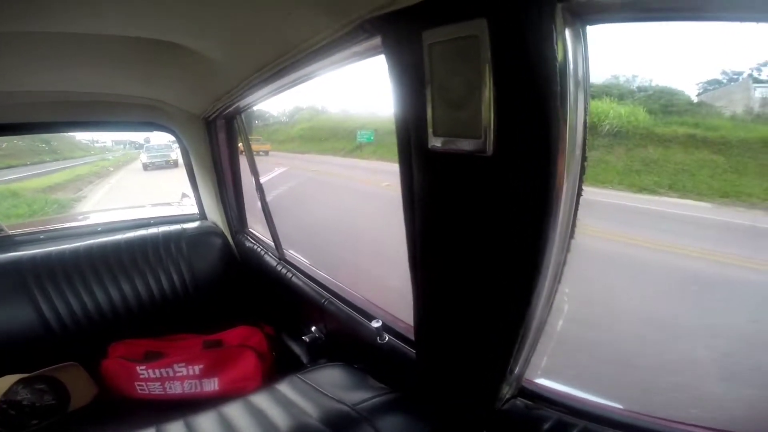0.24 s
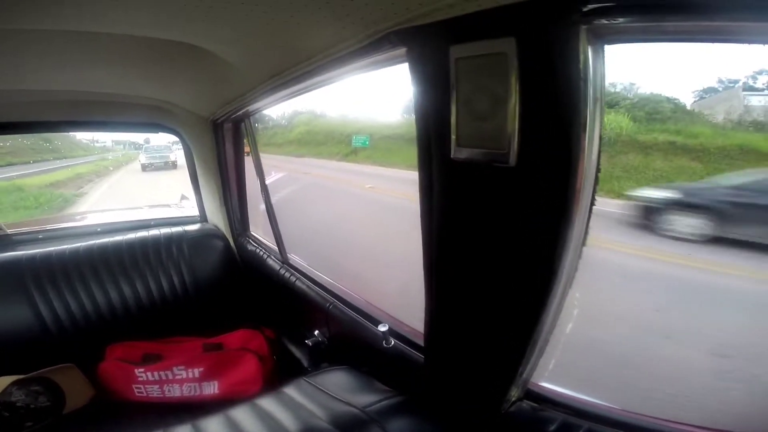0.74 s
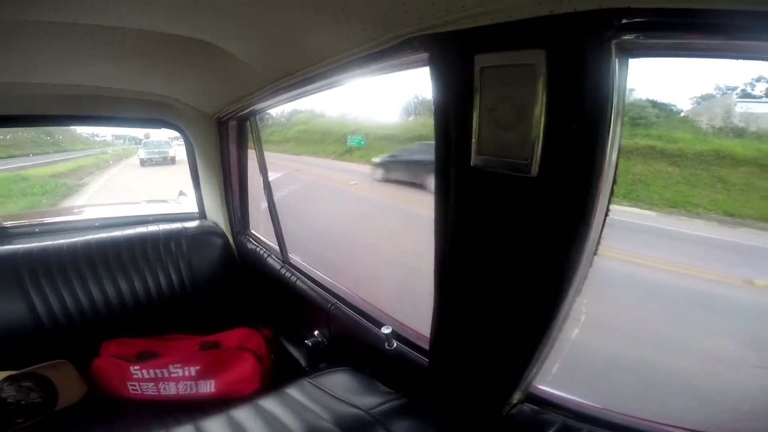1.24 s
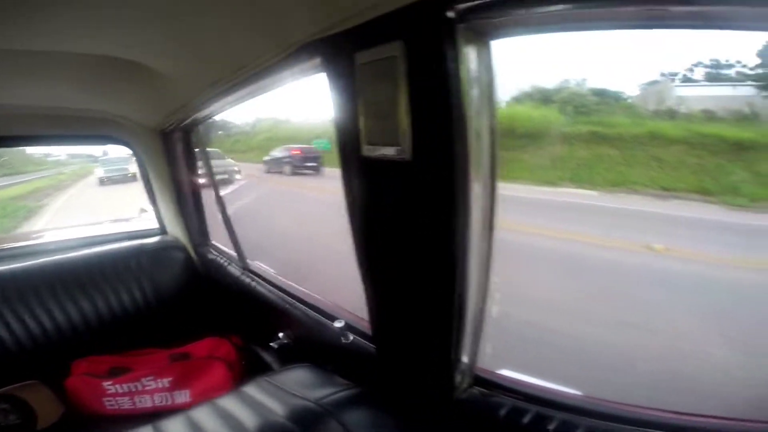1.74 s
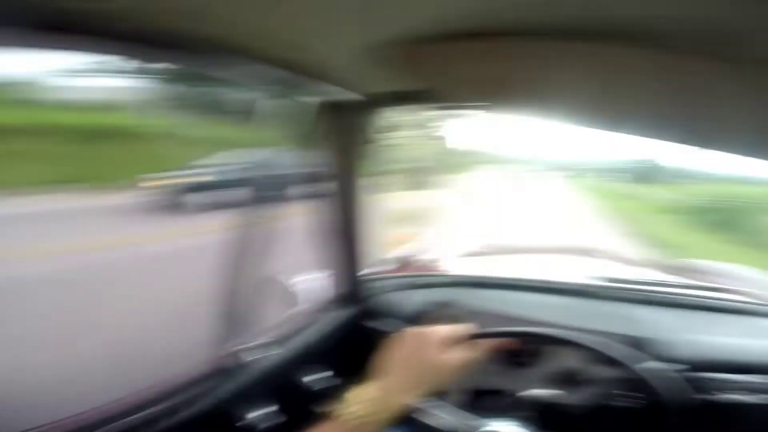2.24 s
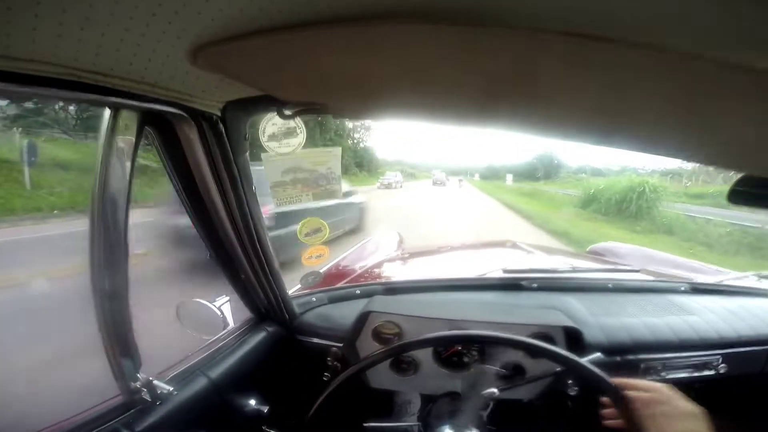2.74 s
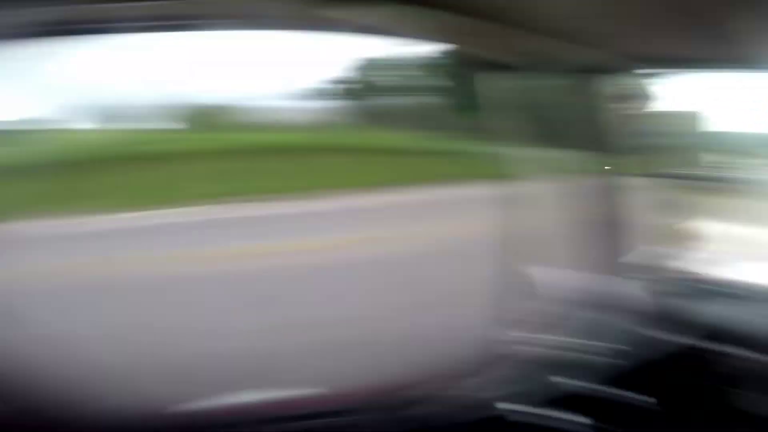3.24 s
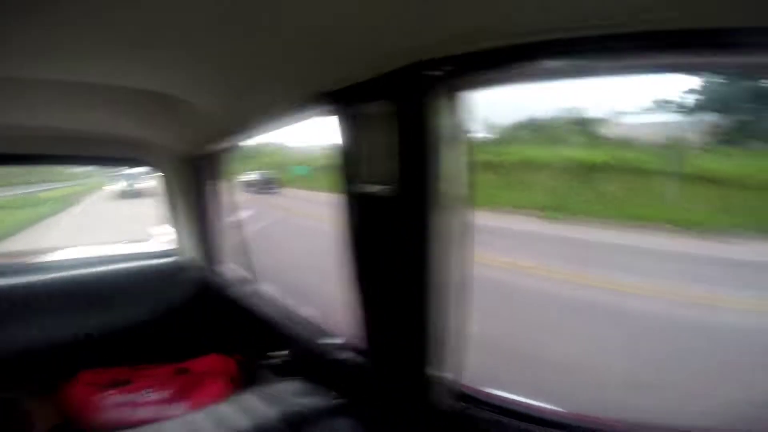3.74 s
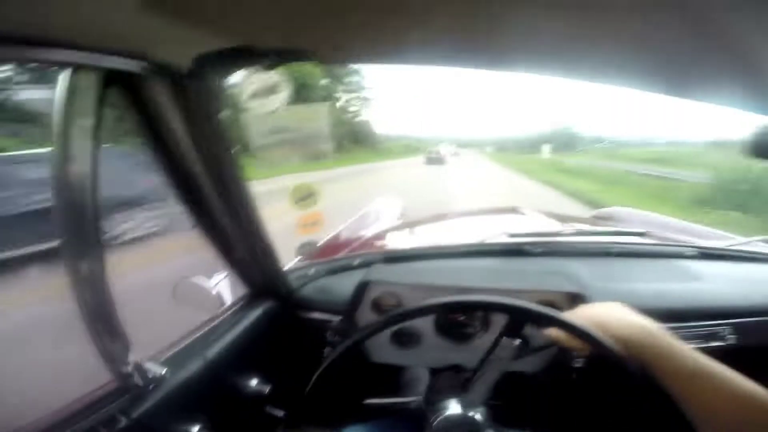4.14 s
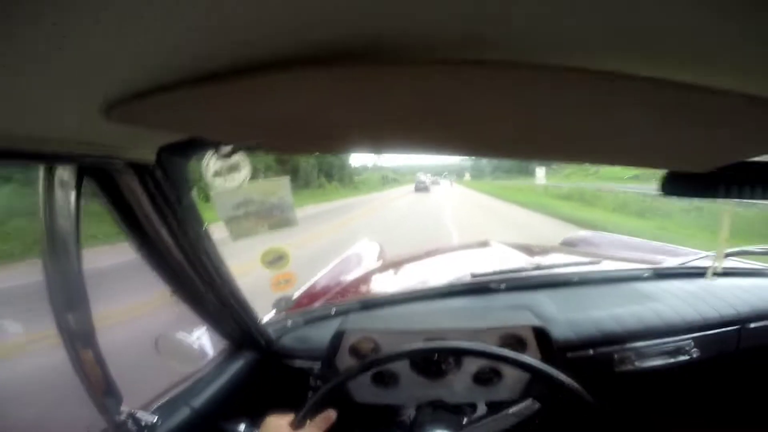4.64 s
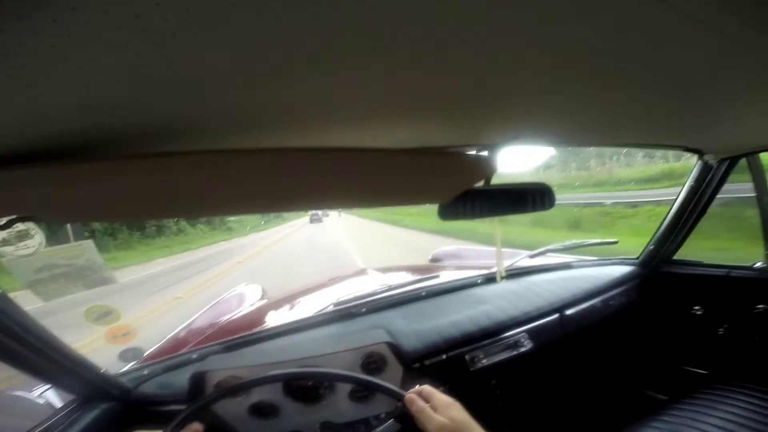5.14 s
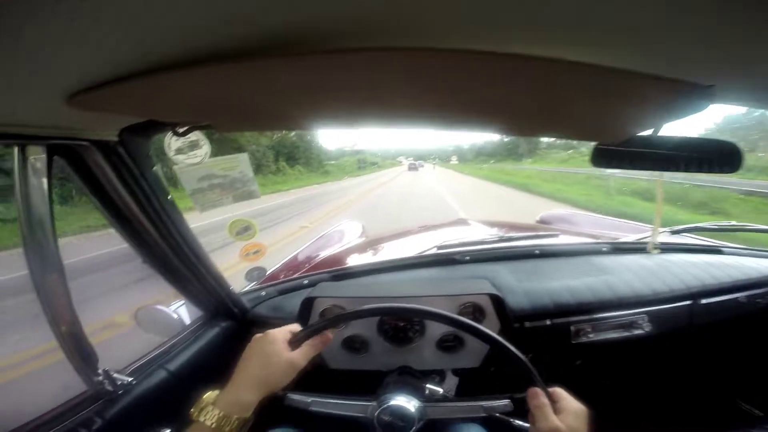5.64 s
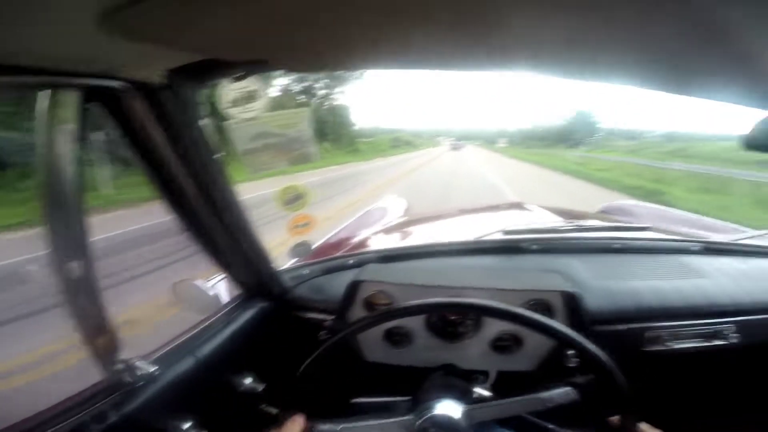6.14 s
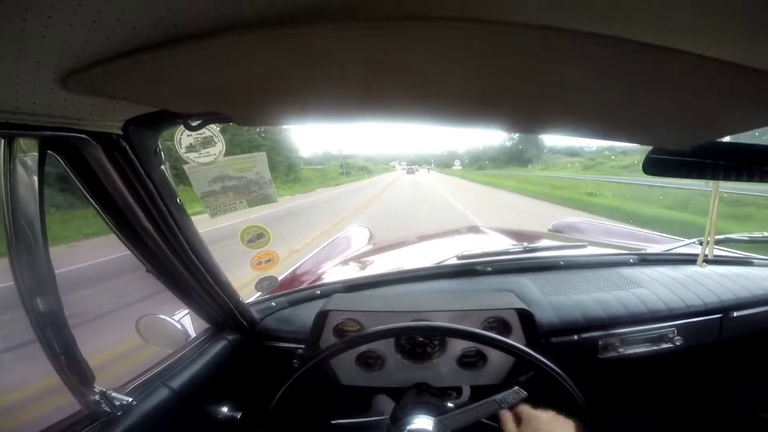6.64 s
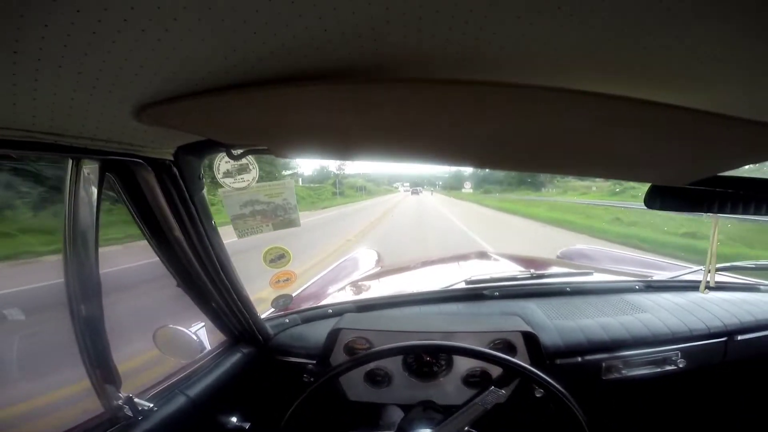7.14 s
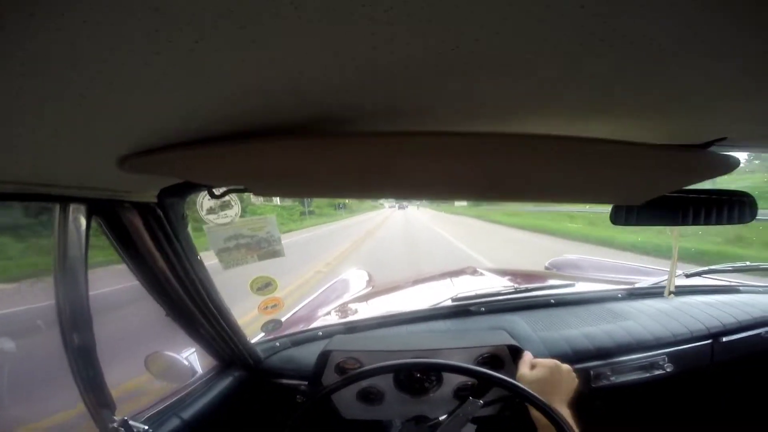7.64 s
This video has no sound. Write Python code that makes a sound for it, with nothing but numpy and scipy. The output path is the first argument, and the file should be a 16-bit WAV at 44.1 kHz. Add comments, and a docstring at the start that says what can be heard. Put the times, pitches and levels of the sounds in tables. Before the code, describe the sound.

An old car's engine idles, then accelerates through a gear change, heard from inside with tyre rumble and a passing car.

```python
"""A straight-six ticking over, heard from the driver's seat of an old saloon on a highway, side window down.
It pulls away, drops for a gear change, pulls again and is let off; its orders sweep through the cabin's
boom resonances, and second gear whines. Tyres and air rush underneath, and an oncoming car swishes past
the window. Close to the microphone the gear lever clunks and loose trim ticks and squeaks."""
import sys
import numpy as np
from scipy import signal
from scipy.fft import rfft, irfft, next_fast_len
from scipy.io import wavfile
from scipy.ndimage import uniform_filter1d

SR = 44100
rng = np.random.default_rng(int(sys.argv[2]) if len(sys.argv) > 2 else 0)


def master_out(mix):
    """Clip the mix to full scale and print it as 16-bit PCM to the path in sys.argv[1]."""
    frames = np.transpose(np.atleast_2d(mix))
    ceiling = np.clip(frames, -1, 1)
    pcm = np.round(ceiling * 32767).astype(np.int16)
    wavfile.write(sys.argv[1], SR, pcm)


N = 348390
TIME = np.arange(N) / SR
AGE = TIME[:SR // 4]  # seconds since a blow
IDLE_HZ = 40  # firing rate at tickover
# Colour of the engine's hiss and of the air at the window. Each row: frequency in Hz, level in dB.
HISS = [(3000, -2), (3700, -6), (4400, -1), (5100, 0.2), (5800, -3), (6400, -8), (7400, -9.5), (8300, -15),
        (9500, -13), (11000, -18), (13000, -25), (15000, -33.5)]


def engine():
    """The straight-six beyond the bulkhead: every layer follows the crankshaft."""
    # Idle, first gear, the change with a lurch of the clutch, second gear, let-off.
    # Each row: time in seconds, firing rate in Hz.
    revs = [(0, 44.5), (1.1, 39.5), (2.07, 40), (2.5, 60), (3.0, 70.5), (3.25, 70.3), (3.4, 82),
            (3.6, 90.9), (3.8, 101.7), (4.2, 122.2), (4.37, 124), (4.6, 104), (5.04, 75), (5.2, 101),
            (5.31, 105.5), (5.5, 93.5), (5.6, 100), (5.8, 104.2), (6.2, 116.2), (6.5, 123.1), (6.75, 130.8),
            (6.9, 133.5), (7.1, 139.1), (7.2, 142.6), (7.32, 143), (7.4, 139.6), (7.9, 105)]
    # The mechanical roar. Each row: time in seconds, level in dB.
    roar_level = [(0, -31.5), (.45, -38), (1.55, -39.5), (2.05, -30), (2.3, -25.5), (2.7, -22), (3.45, -22),
                  (3.75, -24.5), (4.2, -22.5), (4.98, -26.5), (5.12, -21.5), (5.7, -25.5), (6.3, -22.5),
                  (7.33, -19.5), (7.58, -25.5), (7.9, -23.5)]
    firing_hz, roar_db, throttle = in_time(revs), in_time(roar_level), pedal()
    octaves = np.log2(firing_hz / IDLE_HZ)
    cycle_hz = firing_hz / 6  # six firings to a four-stroke cycle
    cycle = np.cumsum(cycle_hz * (1 + .0015 * drift(12))) / SR
    firing_phase = 12 * np.pi * cycle
    coasting_db, pulling_db = -35.5 + 6.5 * octaves, -15
    exhaust_db = (1 - throttle) * coasting_db + throttle * pulling_db
    return (firing_tone(firing_phase, firing_hz, throttle)
            + from_db(exhaust_db + .5 - 1.5 * octaves) * exhaust_boom(cycle, cycle_hz)
            + from_db(roar_db - 6) * growl(cycle, cycle_hz)
            + from_db(exhaust_db) * singing(cycle, cycle_hz)
            + gas_puffs(firing_phase, cycle, exhaust_db, roar_db)
            + from_db(roar_db - 41.5 + 2 * octaves) * noise(HISS)
            + gearbox(cycle, cycle_hz)
            + lugging(firing_phase, firing_hz, throttle))


def pedal():
    """Accelerator travel, 0 to 1: pressed, held, released."""
    # Each row: start in seconds, seconds taken to press, release in seconds, depth from 0 to 1.
    presses = [(2.06, 0.062, 2.35, 0.65), (2.42, 0.68, 4.26, 0.9), (5.055, 0.03, 7.34, 0.92)]
    release_s = .062
    travel = sum(depth * np.clip(np.minimum((TIME - down) / press, 1 - (TIME - up) / release_s), 0, 1)
                 for down, press, up, depth in presses)
    return np.clip(travel, 0, 1)


def firing_tone(firing_phase, firing_hz, throttle):
    """The throbbing note of the firings as the cabin carries it, its level set by revs and pedal."""
    # Each row: firing rate in Hz, level in dB with the pedal up, level in dB with it down.
    levels = [(41, -25, -16), (60, -25, -15), (72.5, -22.5, -17.5), (84.5, -20.5, -18.5), (92, -24, -18),
              (106, -24.5, -12.5), (117.4, -20, -18), (121.2, -17, -13), (130.7, -18.5, -19),
              (137.83, -16.5, -22.5)]
    # Clutch out, the unloaded tone sinks. Each row: centre and half-length in seconds, change in dB.
    clutch_dips = [(4.46, .12, -9), (5.09, .04, -7)]
    hz, up_db, down_db = np.transpose(levels)
    tone_db = (1 - throttle) * np.interp(firing_hz, hz, up_db)
    tone_db += throttle * np.interp(firing_hz, hz, down_db)
    tone_db += sum(db * swell(s, half) for s, half, db in clutch_dips)
    tone = np.sqrt(2) * from_db(tone_db + 1.5 * drift(13)) * np.sin(firing_phase + .16 * drift(13))
    return tone * (1 + .12 * drift(39))  # uneven from firing to firing


def exhaust_boom(cycle, cycle_hz):
    """Low exhaust orders fill the cabin, booming where they meet its resonances."""
    # The cabin's response to the exhaust. Each row: frequency in Hz, gain in dB.
    cabin = [(45, -22.5), (85, -18.5), (108, -9.5), (135, 0.5), (157, -10), (178, -11.5), (200, -1),
             (216, -5.5), (240, -23.5), (300, -23.5), (420, -27)]
    # How loud each exhaust order booms. Each row: multiple of the cycle rate, gain or cut in dB.
    order_levels = [(4, -6), (5, -4), (7, -6), (8, -1), (9, 4), (10, -2), (11, -1), (12, 2), (13, -6),
                    (14, 0), (15, 2), (16, -2), (17, 1), (18, -3), (19, -4), (20, -3)]
    return orders(cycle, cycle_hz, cabin, order_levels, rough=.3, rate=7, stop=22)


def growl(cycle, cycle_hz):
    """Higher orders shake the bulkhead and panels in front of the seat."""
    # Their response. Each row: frequency in Hz, gain in dB.
    bulkhead = [(220, -12), (300, -2), (400, -2), (460, 1), (500, -3), (555, 2), (610, 0), (680, -2),
                (790, -4), (824, 2), (860, -8), (1000, -16), (1300, -22)]
    # A few slightly louder orders. Each row: multiple of the cycle rate, gain in dB.
    order_levels = [(24, 4), (26, 2), (28, 2), (33, 2)]
    return orders(cycle, cycle_hz, bulkhead, order_levels, rough=.5, rate=5, stop=68)


def orders(cycle, cycle_hz, response, order_levels, rough, rate, stop):
    """Unequal cylinders sound multiples of the cycle rate; each wavers and follows the body's response."""
    out, order_db = np.zeros(N), dict(order_levels)
    for k in range(3, stop):
        if k != 6:  # the sixth order is the firing tone itself
            # cabin echoes delay the higher orders more, smearing the beats into a drone
            lag = .073 * k * k + .45 * rng.random()
            angle = 2 * np.pi * (k * cycle - lag)
            gain = from_db(at_hz(response, k * cycle_hz) + order_db.get(k, 0))
            wave = (1 + rough * drift(rate)) * np.cos(angle) + rough * drift(rate) * np.sin(angle)
            out += gain * wave
    return out / np.sqrt(uniform_filter1d(out ** 2, SR // 4))  # unit power over each quarter second


def singing(cycle, cycle_hz):
    """The revs carry an order across a body resonance, which swells and rings on at its own pitch."""
    # Each row: order, resonance in Hz, half-width in Hz, level in dB relative to the exhaust.
    crossings = [(9, 206, 11, -3.5), (11, 199, 9, -3), (12, 139, 15, 1.5), (12, 202, 9, -1.5),
                 (14, 228, 12, -9), (15, 252, 14, -13), (16, 380, 8, -15), (17, 200, 8, -9),
                 (24, 282, 8, -15), (27, 353, 25, -15), (39, 456, 9, -13), (41, 572, 14, -8),
                 (44, 608, 14, -13), (36, 824, 14, -14)]
    out, rough = np.zeros(N), .25
    for k, hz, half, db in crossings:
        wave = np.sin(2 * np.pi * k * cycle + rough * drift(30)) * (1 + rough * drift(26))
        nearness = bell(k * cycle_hz, hz, half)
        out += from_db(db) * resonate(nearness * wave, hz, width=1.2 * half)
    return np.sqrt(2) * out


def gas_puffs(firing_phase, cycle, exhaust_db, roar_db):
    """Gas and valve noise puffs once a firing and lopes once a cycle, ringing the cabin and panels."""
    # Cabin resonances. Each row: frequency in Hz, width in Hz, relative level in dB.
    cabin_modes = [(136.5, 39, -6.5), (195.4, 48.4, -2.5)]
    # Panel resonances. Each row: frequency in Hz, width in Hz, relative level in dB.
    panel_modes = [(461.3, 36, 0.5), (550.3, 27, -1), (610.6, 52, 1.5), (740, 110, -3), (826, 12, -8.5),
                   (1598, 100, -19), (1869, 90, -22)]
    # Colour of the gas noise. Each row: frequency in Hz, level in dB.
    roar_colour = [(270, 1.5), (350, 2), (480, -7.5), (600, -3), (720, -6), (810, -14), (900, -12),
                   (1100, -19.5), (1400, -25), (1600, -23), (2300, -30), (2800, -36.5), (3300, -42)]
    puffs = 1 + .25 * np.cos(firing_phase) + .11 * np.cos(2 * np.pi * cycle)
    flutter = from_db(exhaust_db - 9.5) * ringing(puffs * rng.standard_normal(N), cabin_modes)
    panels = from_db(roar_db - 8) * ringing(puffs * rng.standard_normal(N), panel_modes, patchy_db=1.5)
    roar = from_db(roar_db - 5) * rms_one(puffs * noise(roar_colour))
    return flutter + panels + roar


def lugging(firing_phase, firing_hz, throttle):
    """Pulling hard at low revs, every firing hammers the mounts and floor pan."""
    # Their resonances. Each row: frequency in Hz, width in Hz, relative level in dB.
    floor_modes = [(230.5, 40, 2), (285.7, 55, 3.5), (338, 49, -2), (404, 51, -3), (455, 45, 2.5),
                   (586, 34, -4.5), (682, 66, -6)]
    blows = ((1 + np.cos(firing_phase)) / 2) ** 3 * rng.standard_normal(N)
    strain = throttle * bell(firing_hz, centre=77, half=13)
    return from_db(-25.5) * strain * ringing(blows, floor_modes)


def gearbox(cycle, cycle_hz):
    """In second gear, teeth and shafts whine out of step with the firing and swell at each resonance."""
    # Each row: multiple of the cycle rate, level in dB before the path.
    gear_tones = [(5.37, -4.5), (8.7, -1), (10.78, -3), (15.2, -3), (19.25, -2), (25.08, 0), (31.9, -5)]
    # The path from gearbox to cabin. Each row: frequency in Hz, gain in dB.
    path = [(90, -39), (125, -31), (165, -34), (200, -29), (240, -44), (295, -35), (330, -43), (375, -37),
            (425, -39), (462, -29), (485, -37), (505, -33), (530, -33), (555, -23), (574, -34),
            (596, -26.5), (620, -35), (700, -37), (765, -30), (800, -39)]
    start_s, end_s, rough = 5.1, 7.45, .17
    engaged = np.clip(np.minimum(TIME - start_s, end_s - TIME) / .1, 0, 1)
    out = np.zeros(N)
    for k, db in gear_tones:
        gain = from_db(db + at_hz(path, k * cycle_hz)) * (1 + rough * drift(16))
        out += gain * np.sin(2 * np.pi * k * cycle + rough * drift(7.1))
    return engaged * np.sqrt(2) * out


def road():
    """Tyres rush and hum below, air hisses past the window frame, and the body shakes on its springs."""
    # Colour of the tyre rush. Each row: frequency in Hz, level in dB.
    tyre_colour = [(60, 0), (90, -14), (130, -2), (215, -2), (280, -13), (470, -18.5), (550, -17),
                   (780, -15), (900, -23), (1050, -23.5), (1350, -31), (2300, -34), (2900, -49.5),
                   (3500, -45.5)]
    # Narrow, steady hums. Each row: frequency in Hz, width in Hz, relative level in dB.
    hum_modes = [(551.7, 10, -3.5), (746.5, 22, -2), (212, 44, 6)]
    # Colour of the shake. Each row: frequency in Hz, level in dB.
    shake_colour = [(12, -13), (22, 5), (40, -3.5), (65, -8), (95, -9), (150, -16.5)]
    # The shake over rougher and smoother road. Each row: time in seconds, level in dB.
    shake_level = [(0, -27.5), (1.9, -35.5), (2.35, -17.5), (3.1, -23.5), (3.65, -22.5), (4.15, -19.5),
                   (5.2, -19.5), (5.55, -25), (6.2, -28.5), (6.8, -23), (7.9, -21.5)]
    tyres = from_db(-27 + drift(6.9)) * noise(tyre_colour)
    hum = from_db(-35.5) * ringing(rng.standard_normal(N), hum_modes)
    air = from_db(-68 + .5 * drift(25)) * noise(HISS)
    shake = from_db(in_time(shake_level)) * noise(shake_colour)
    return tyres + hum + air + shake


def body():
    """Bumps and drivetrain jolts thump the shell around the microphone, and panels briefly buzz."""
    # Each row: centre and half-length in seconds, level in dB, pitch in Hz.
    bumps = [(2.175, .04, -24, 46), (2.318, .04, -23, 54), (2.3, .09, -22, 130), (3.595, .025, -14, 42),
             (4.09, .045, -21, 54), (4.565, .028, -14.5, 54), (4.57, .04, -21, 135), (4.74, .04, -20, 132),
             (5.095, .025, -21, 200), (5.13, .035, -14, 134), (5.23, .04, -20, 26), (7.5, .05, -21, 27)]
    # Each row: centre and half-length in seconds, pitch in Hz, wavers per second, level in dB.
    buzzes = [(.36, .12, 554, 25, -38), (1.1, .14, 550, 35, -42), (4.22, .1, 825, 15, -32.5),
              (4.47, .07, 830, 20, -33), (7.04, .08, 824, 5, -24)]
    rumble = from_db(-6) * noise([(35, 8), (65, -4.5), (140, 1.5), (220, -14.5)])
    thumps = sum(from_db(db) * swell(s, half) * (wavering(hz, rate=15, radians=.59) + rumble)
                 for s, half, db, hz in bumps)
    return thumps + sum(from_db(db) * swell(s, half) * wavering(hz, rate, radians=.7)
                        for s, half, hz, rate, db in buzzes)


def traffic():
    """Oncoming tyres swish through the open window, falling in pitch as they go by."""
    # Colour of their high hiss. Each row: frequency in Hz, level in dB.
    sizzle_colour = [(2600, -1), (3700, -8), (4400, -0.5), (5000, 3), (5700, -3.5), (6500, -10),
                     (8000, -15), (9500, -10.5), (13000, -25)]
    # Colour of the swish. Each row: frequency in Hz, level in dB.
    swish_colour = [(500, -10.5), (800, 0), (1050, -3.5), (1350, -12.5), (1750, -8), (2300, -19.5),
                    (3000, -36), (5000, -38.5), (10000, -46)]
    # Each row: moment of passing and half-length in seconds, level in dB, band centre in Hz.
    swishes = [(1.8, .2, -47, 2250), (2.39, .18, -36, 2220), (2.38, .22, -32, 730),
               (2.65, 0.08, -25.5, 610), (2.6, .12, -35, 1320), (.3, 0.1275, -46, 990)]
    out = from_db(-57.5) * swell(2.52, .23) * noise(sizzle_colour)
    for s, half, db, hz in swishes:
        swish = resonate(noise(swish_colour), hz, .5 * hz)
        doppler = 1 - .08 * np.tanh((TIME - s) / half)
        passing = np.interp(np.cumsum(doppler), np.arange(N), swish)
        out += from_db(db) * swell(s, half) * rms_one(passing)
    return out


def gear_lever():
    """An arm's length away the lever clunks, and the floor thuds under it."""
    # Each row: start in seconds, level in dB.
    clunks = [(3.558, -37), (3.568, -35.5), (4.55, -37), (4.683, -37), (4.724, -35), (4.736, -34),
              (4.746, -36), (4.998, -37), (5.008, -35)]
    # The lever's ring. Each row: frequency in Hz, relative level in dB, seconds to fall 60 dB.
    lever_modes = [(1050, -3, .05), (1250, -2, .05), (1530, 0, .05), (1770, 2, .05), (1960, 0, .05),
                   (2210, -1, .045), (2450, -6, .04), (2740, -13, .04), (3700, -15, .04)]
    out = np.zeros(N)
    for s, db in clunks:
        thud = from_db(-1) * decay(.07) * steep_band(rng.standard_normal(len(AGE)), hz=1300, width=1700)
        add(out, s, from_db(db) * (struck(lever_modes) + thud))
    return out


def trim_ticks():
    """Gear linkage and loose trim tick nearby: a crack and a metal ring."""
    # Each row: start in seconds, crack level in dB, its centre in Hz, its seconds to fall 60 dB,
    # ring level in dB.
    ticks = [(1.185, -62, 5500, .1, -58), (1.98, -61, 4500, .08, -64), (3.729, -59, 8000, 0.078, -58),
             (3.741, -58, 8000, .06, -61), (4.056, -64, 7000, 0.026, -63), (4.091, -55, 7000, 0.033, -56),
             (4.132, -49.5, 7000, .05, -51), (4.549, -47, 4300, .075, -57), (4.68, -43, 7000, .06, -50),
             (4.701, -55, 6500, .06, -54), (4.738, -50, 3850, 0.14, -53), (4.754, -54, 5500, .1, -56),
             (7.52, -61, 7500, .08, -54), (7.53, -56, 7500, .06, -54), (7.636, -61, 5500, .06, -60)]
    # The fittings' ring. Each row: frequency in Hz, relative level in dB, seconds to fall 60 dB.
    metal_modes = [(4300, -5, .08), (4650, -3, .09), (5566, 0, .13), (5850, -5, .07), (6912, -5, .07),
                   (7450, -3, .1), (9378, -6, .06), (10340, -5, .05)]
    out = np.zeros(N)
    for s, db, hz, t60, ring_db in ticks:
        crack = decay(t60) * steep_band(rng.standard_normal(len(AGE)), hz, .8 * hz)
        add(out, s, from_db(db) * crack + from_db(ring_db) * struck(metal_modes))
    return out


def rattle():
    """A small loose metal part: each touch is a dry crack and a pair of close modes."""
    # Each row: start in seconds, level in dB, pitch in Hz.
    touches = [(3.557, -53.5, 5600), (3.566, -56, 5600), (3.573, -56, 4950), (3.58, -53, 4500),
               (3.596, -57, 4500)]
    out, t60 = np.zeros(N), .09
    for s, db, hz in touches:
        crack = from_db(-3) * decay(t60) * rms_one(resonate(rng.standard_normal(len(AGE)), hz, hz / 4))
        ring = struck([(hz, 0, t60), (hz * 1.05, -4, t60)])
        add(out, s, from_db(db) * (ring + crack))
    return out


def squeaks():
    """Tight fittings squeak in short, unsteady upward glides."""
    # Each row: start and length in seconds, first and last pitch in Hz, level in dB.
    glides = [(4.232, .04, 10900, 12500, -59), (7.3, .05, 11200, 11400, -62),
              (3.725, .035, 7400, 7550, -59), (5.015, .05, 4750, 5050, -53)]
    out = np.zeros(N)
    for s, length, start_hz, end_hz, db in glides:
        along = np.clip((TIME - s) / length, 0, 1)
        hz = (start_hz + (end_hz - start_hz) * along) * (1 + .025 * drift(300))
        out += from_db(db) * np.sin(np.pi * along) * np.sin(2 * np.pi * np.cumsum(hz) / SR)
    return out


def faint_swish():
    """A faint, high swish in the first half second, perhaps a passing bicycle."""
    # Each row: time in seconds, level in dB.
    level = [(.08, -90), (.15, -63), (.22, -63.5), (.38, -69), (.5, -90)]
    # Each row: frequency in Hz, level in dB.
    colour = [(4000, -3), (5700, 1), (6600, -7.5), (7400, -1.5), (8300, -8.5), (9400, -1), (10500, -7.5),
              (13000, -14)]
    return from_db(in_time(level)) * noise(colour)


def electrical_whine():
    """Faint, steady electrical tones far behind everything else."""
    # Each row: frequency in Hz, level in dB.
    tones = [(8781, -85), (11718, -83)]
    return sum(from_db(db) * np.sin(2 * np.pi * hz * TIME) for hz, db in tones)


def from_db(db):
    """Decibels to gain."""
    return 10 ** (np.asarray(db) / 20)


def rms_one(x):
    """Scale to unit power."""
    return x / np.sqrt(np.mean(x ** 2) + 1e-20)


def in_time(rows):
    """A curve of (seconds, value) points, sample by sample."""
    return np.interp(TIME, *np.transpose(rows))


def at_hz(points, hz):
    """Read a spectrum in dB on a log-frequency axis."""
    f, db = np.transpose(points)
    return np.interp(np.log(hz), np.log(f), db)


def bell(x, centre, half):
    """A bell curve of height 1 and standard deviation `half`."""
    return np.exp(-.5 * ((x - centre) / half) ** 2)


def swell(s, half):
    """A bell-shaped rise and fall around second `s`."""
    return bell(TIME, s, half)


def decay(t60):
    """The fade after a blow: 60 dB in `t60` seconds."""
    return from_db(-60 * AGE / t60)


def drift(rate):
    """Random wander of spread 1, smoothed above `rate` Hz."""
    step, settle = 40, 2000
    r = np.exp(-2 * np.pi * step * rate / SR)
    slow = signal.lfilter([1], [1, -2 * r, r * r], rng.standard_normal(N // step + settle + 2))[settle:]
    return np.interp(np.arange(N) / step, np.arange(len(slow)), rms_one(slow))


def wavering(hz, rate, radians):
    """A tone of rms 1 whose phase wanders."""
    return np.sqrt(2) * np.sin(2 * np.pi * (hz * TIME + rng.random()) + radians * drift(rate))


def noise(colour):
    """Noise of a given colour that falls away steeply past its ends; rms 1."""
    size = next_fast_len(N)
    hz = np.maximum(np.fft.rfftfreq(size, 1 / SR), 1)
    ends = 1 / (1 + (colour[0][0] / hz) ** 8) / (1 + (hz / colour[-1][0]) ** 8)
    spectrum = rfft(rng.standard_normal(size)) * from_db(at_hz(colour, hz)) * ends
    return rms_one(irfft(spectrum, size)[:N])


def resonate(x, hz, width):
    """One resonance with gain 1 at its peak."""
    r = np.exp(-np.pi * width / SR)
    feedback = [1, -2 * r * np.cos(2 * np.pi * hz / SR), r * r]
    return signal.lfilter(np.array([1, 0, -1]) * (1 - r * r) / 2, feedback, x)


def steep_band(x, hz, width):
    """The same resonance twice over, for steeper sides; rms 1."""
    return rms_one(resonate(resonate(x, hz, width), hz, width))


def ringing(x, modes, patchy_db=0):
    """Parallel resonances, each swelling and fading on its own by about `patchy_db`; rms 1."""
    return rms_one(sum(from_db(db + patchy_db * drift(3.6)) * steep_band(x, hz, width * 1.14)
                       for hz, width, db in modes))


def struck(modes):
    """One blow on a set of modes, each with a strength and a slight detuning of its own."""
    hz, db, t60 = np.transpose(modes)[:, :, None]
    gain = from_db(db + 2 * rng.standard_normal(db.shape))
    hz = hz * (1 + .025 * rng.standard_normal(hz.shape))
    rings = gain * decay(t60) * np.sin(2 * np.pi * (hz * AGE + rng.random(hz.shape)))
    attack = np.minimum(AGE / .002, 1)
    return attack * rings.sum(0) * np.sqrt(2 / np.sum(gain ** 2))


def add(out, s, sound):
    """Mix a short sound in at second `s`."""
    part = out[int(s * SR):][:len(sound)]
    part += sound[:len(part)]


def scene():
    """Everything that reaches one microphone at the driver's seat."""
    driving = engine() + road() + body() + traffic()
    fittings = trim_ticks() + rattle() + gear_lever() + squeaks()
    return (driving + fittings + faint_swish() + electrical_whine())[None]


def record(dry):
    """The microphone adds its own faint hiss, rounds the tallest peaks and cuts the top of the range."""
    # Colour of that hiss. Each row: frequency in Hz, level in dB.
    self_noise = [(500, -0.5), (8000, -1), (11000, -2), (14500, -3.5)]
    ceiling, cutoff_hz = .85, 15600
    heard = dry + from_db(-69.5) * noise(self_noise)
    rounded = heard / (1 + (heard / ceiling) ** 8) ** (1 / 8)
    fade = np.clip(np.minimum(TIME, TIME[-1] - TIME) / .006, 0, 1)
    return signal.sosfilt(signal.cheby2(12, 70, cutoff_hz, fs=SR, output="sos"), rounded * fade)


dry = scene()
out = record(dry)
master_out(out)
```